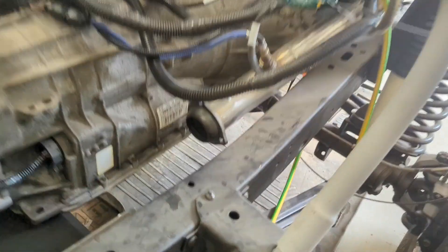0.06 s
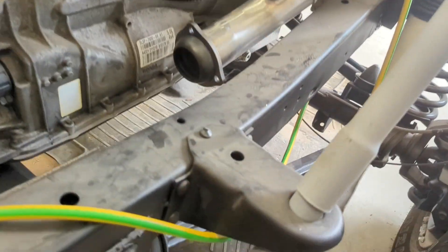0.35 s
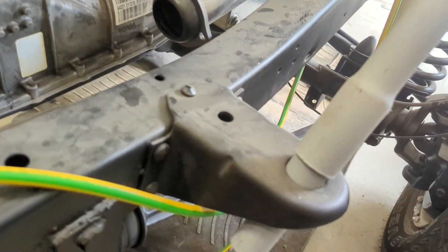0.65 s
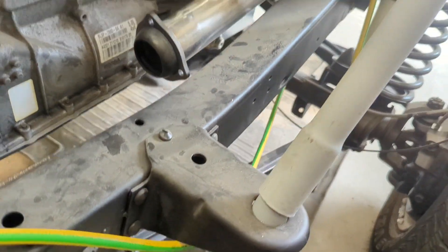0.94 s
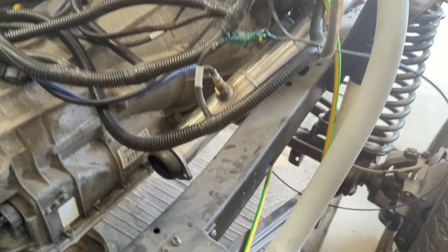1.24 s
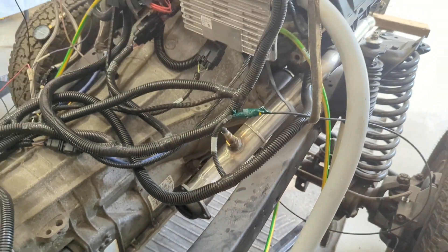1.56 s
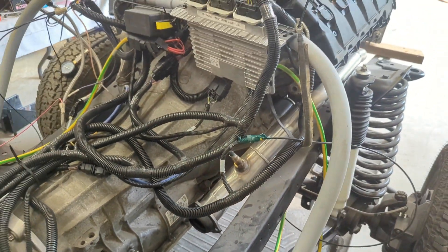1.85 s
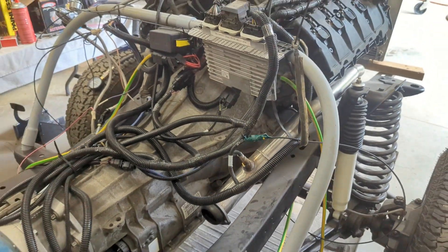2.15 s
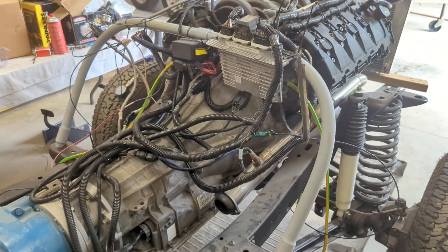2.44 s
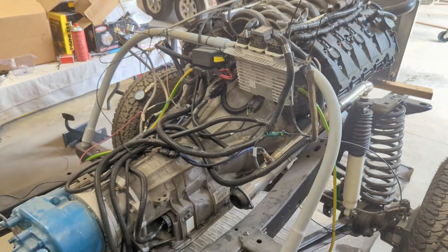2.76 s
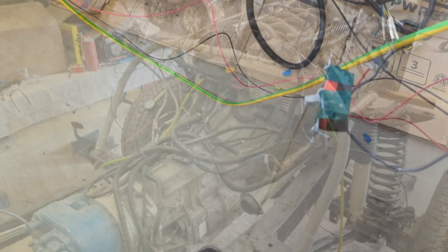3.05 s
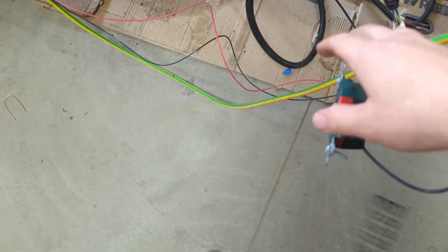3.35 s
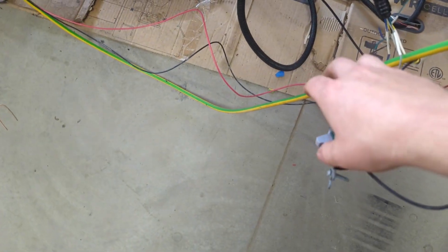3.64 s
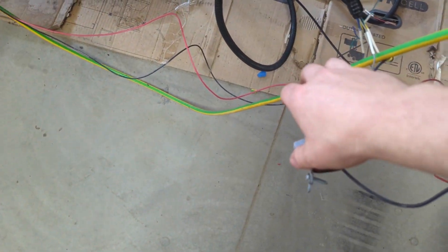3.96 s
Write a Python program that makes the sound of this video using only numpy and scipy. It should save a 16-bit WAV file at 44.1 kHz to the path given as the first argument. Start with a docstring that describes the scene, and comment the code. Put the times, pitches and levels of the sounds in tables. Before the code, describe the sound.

Throbbing V8 engine idling on open pipes, its speed sagging slightly, with sharp spits and ticking.

```python
"""A workshop, where a V8 idles on open exhaust pipes, sagging slowly from about 950 to 770 rpm.
Eight uneven firings puff into two ringing pipes for a lumpy throb, with rising chugs and a gas rasp.
Two cylinders spit sharply in every cycle, as from a leaking manifold. Underneath lie a mechanical
wash, a faint belt whine and a low rumble; a soft scrape passes once. Near 3 s the sound dissolves
to a spot beside the engine, where the pipes bark more and the valves clatter."""
import sys
import numpy as np
from scipy import signal
from scipy.fft import rfft, irfft
from scipy.io import wavfile
from scipy.ndimage import uniform_filter1d, minimum_filter1d

SR = 44100
rng = np.random.default_rng(int(sys.argv[2]) if len(sys.argv) > 2 else 0)


def inscribe(sig):
    """Save sig as 16-bit PCM at rate SR to the path in sys.argv[1].

    A 1-D sig is mono; a 2-D sig holds one channel per row.
    Samples are clipped to [-1, 1] before scaling.
    """
    pcm = np.round(np.clip(np.atleast_2d(sig).T, -1, 1) * 32767)
    wavfile.write(sys.argv[1], SR, pcm.astype(np.int16))


N = 176400
TIME = np.arange(N) / SR

# The lump of the idle, cylinders in firing order: late_ms, strength_db, puff_corner_hz
FAST_FIRINGS = [(-0.7, 7.5, 355), (-3.5, 0.5, 490), (-2, 6, 530), (-3, 18, 274), (-6, 9.5, 610),
                (-1.5, 8.5, 470), (-1.5, 20, 543), (-3, 18, 217)]
SLOW_FIRINGS = [(-3, 20, 162), (-4.5, 20, 200), (-4.5, -2, 940), (-3, 4, 300), (-9, -20, 190),
                (-6.5, 12, 380), (-3, -13.5, 140), (-4.5, 12, 210)]
SIDE_FIRINGS = [(-1.33, 21.2, 175), (-1.62, 29, 128), (-0.22, 4.7, 346), (0, 19.3, 196), (-0.29, 21, 222),
                (1, 21.2, 95), (-1.2, 14.3, 270), (-1.36, 24.7, 146)]
# The pipe each cylinder fires into: pipe_index
PIPE_OF_CYLINDER = [0, 1, 1, 0, 1, 0, 0, 1]
# Resonances of the two pipes, from behind and from the side: pitch_hz, width_hz, gain_db
REAR_PIPE_A = [(92, 29, -9.5), (97.35, 11.4, 3), (201.2, 9.7, -6.5), (480, 68, -15.5)]
REAR_PIPE_B = [(70.4, 17.8, -6), (128.4, 61, -9), (307.2, 13.2, -2.5)]
SIDE_PIPE_A = [(74.7, 18.8, 0), (87.3, 55.6, -1.5), (261.3, 5, 6), (442, 55, 2.5)]
SIDE_PIPE_B = [(113, 21, -10.5), (277.7, 20.7, 10)]
# The engine labouring, from fast-idle tone (0) to slow (1): time_s, load_fraction, throb_gain_db
LOAD = [(0, 0.15, -60.5), (0.701, 0.03, -58), (1.3, 0.3, -57.5), (1.75, 0.65, -56.5), (2.25, 0.73, -59),
        (3.001, 1, -59.5)]
# Rising chugs in every cycle: start_cycles, length_cycles, from_hz, to_hz, level_db
FAST_CHUGS = [(-.28, 0.543, 159.5, 238.7, -19), (-.1, 0.648, 225, 360, -18), (.46, .58, 220, 425, -20),
              (.3, 0.532, 365, 530, -28.5)]
SLOW_CHUGS = [(-.26, 0.582, 98.1, 276.8, -13.5), (-.04, 0.506, 225.6, 351.3, -19.5)]
SIDE_CHUGS = [(-0.2027, 0.817, 84.5, 145.6, -13), (0, .58, 205, 455, -17.5), (-.24, 0.483, 260, 460, -20),
              (0.33, 0.386, 168.4, 287, -18)]
# Tone colours of the noise layers: frequency_hz, relative_db
RASP_COLOUR = [(200, 2), (450, 2.5), (570, -22), (700, -3.5), (1000, -9), (1500, -17), (3000, -25),
               (9000, -37)]
REAR_WASH_COLOUR = [(290, -59), (500, 3.5), (773, 3.5), (880, -4), (1380, -1.5), (2930, -4), (3250, -7),
                    (5240, -12), (9920, -16), (12500, -15), (16000, -36)]
SIDE_WASH_COLOUR = [(290, -6), (500, 3.5), (553, -23), (1180, -18.5), (1440, -14), (3200, -21.5),
                    (12000, -27.5), (16000, -27)]
RUMBLE_COLOUR = [(20, -22), (38, 5), (90, -10), (160, -4.5), (300, -3.5), (450, -9.5), (600, -31),
                 (1200, -40.5)]
SPIT_COLOUR = [(600, 7), (1400, -3), (2100, 5.5), (2900, 2), (3700, -4), (6000, -1.5), (7800, 0),
               (8800, -2), (9400, 1.5), (10300, -7), (11300, 0), (12300, -1.5), (13500, -1.5), (16000, -10)]
TICK_COLOUR = [(600, 7.5), (1500, -2.5), (3000, -5.5), (4200, -6.5), (5300, -6.5), (6500, -4.5), (7700, -7),
               (8800, -8), (10500, -9), (12400, -3), (16000, -18)]
# Two leaking cylinders, a quarter cycle apart; the first also times the crank: start_s, level_db
FIRST_SPITS = [(0.0844, -20), (0.2095, -19.5), (0.3379, -22), (0.4656, -23.5), (0.595, -23.5), (0.729, -22),
               (0.86, -23.5), (0.992, -22.5), (1.1251, -24), (1.259, -26), (1.3942, -23), (1.532, -25),
               (1.6701, -20.5), (1.8133, -22), (1.9575, -24.5), (2.104, -21.5), (2.249, -19), (2.3996, -19),
               (2.5559, -21.5), (2.7116, -23.5), (2.8678, -20.5)]
SECOND_SPITS = [(0.114, -21.5), (0.239, -27), (0.366, -20), (0.4956, -20), (0.6263, -21), (0.7597, -23.5),
                (0.8914, -25), (1.0234, -21), (1.1568, -25.5), (1.289, -26), (1.4267, -23.5), (1.5647, -23),
                (1.7049, -21), (1.8473, -20.5), (1.992, -21), (2.139, -21.5), (2.2813, -24.5),
                (2.4367, -19.5), (2.593, -21), (2.7463, -21.5), (2.9055, -25)]
# The manifold's ring after a spit: pitch_hz, fast_idle_db, slow_idle_db, t60_s
MANIFOLD_MODES = [(2080, -32, -39, 0.12), (2264, -30, -41, 0.074), (2760, -48, -21, 0.061),
                  (2970, -25.5, -25.5, 0.053), (8740, -28.5, -32, 0.06), (9880, -21.5, -26, 0.036),
                  (10440, -20, -34, 0.043), (12280, -22.5, -32, 0.038)]
# Valve ticks in every cycle: start_cycles, relative_db
VALVE_TICKS = [(0, 5), (.24, 2), (.37, -8), (0.562, 3), (.68, -4), (.79, 1.5), (.87, -1), (.11, -5)]
# The loudest valve taps: start_s, level_db
VALVE_TAPS = [(3.2455, -31), (3.2836, -19), (3.3811, -28), (3.4, -15), (3.4381, -20), (3.5574, -11),
              (3.5945, -21), (3.752, -17)]
# The ring of each tap: pitch_hz, relative_db, t60_s
VALVE_MODES = [(5280, -5, 0.02), (6330, -11.5, 0.028), (7150, -26, .03)]
# Stereo placement: frequency_hz, left_minus_right_db
PAN = [(100, 1), (300, -2), (640, 1), (1400, -4), (2200, -9.5), (3100, -5), (6000, -0.5), (15000, 2.5)]
# Stereo focus of the noises: frequency_hz, left_right_correlation
LIKENESS = [(40, .998), (110, 0.97), (300, 0.74), (550, 0.94), (1000, 0.42), (2200, -0.005), (5000, -0.14),
            (10000, 0.22)]
# The workshop's decay: frequency_hz, t60_s
ROOM_DECAY = [(200, 0.15), (2000, 0.18), (6000, 0.11), (14000, 0.057)]

SIDE_START_S, SIDE_CYCLE_S = 2.778, 0.1559
DISSOLVE_S, DISSOLVE_LENGTH_S = 2.82, 0.3
EXHAUST_WET_DB, SPIT_WET_DB = -24.5, -10.5


def amp(db):
    """Decibels to gain."""
    return 10 ** (np.asarray(db) / 20)


def unit(x):
    """Scales to rms 1."""
    return x / np.sqrt(np.mean(x ** 2) + 1e-20)


def curve_at(points, hz):
    """Reads a table on a log-frequency axis."""
    frequencies, values = np.transpose(points)
    return np.interp(np.log(hz + 1), np.log(frequencies), values)


def add(mix, start_s, sound):
    """Mixes a sound in at its start time."""
    i = round(start_s * SR)
    part = mix[max(i, 0):max(i + len(sound), 0)]
    part += sound[max(-i, 0):][:len(part)]


def noise(colour, envelope=1., pan_depth=1.):
    """Noise under an envelope, then coloured and spread in stereo."""
    hz = np.fft.rfftfreq(N, 1 / SR)
    left, independent = rfft(rng.standard_normal((2, N)) * envelope)
    likeness = np.clip(curve_at(LIKENESS, hz), -1, 1)
    right = likeness * left + np.sqrt(1 - likeness ** 2) * independent
    pair = np.array([left, right]) * amp(np.outer([.5, -.5], pan_depth * curve_at(PAN, hz)))
    return irfft(pair * unit(amp(curve_at(colour, hz))), N)


def bursts(events, rise_s, fall_s):
    """A snappy envelope for rows of start_s, level_db; overlaps add in power."""
    t, power = np.arange(SR // 16) / SR, np.zeros(N)
    shape = np.minimum(t / rise_s, 1) * np.exp(-np.maximum(t - rise_s, 0) / fall_s)
    for start_s, db in events:
        add(power, start_s, (amp(db) * shape) ** 2)
    return np.sqrt(power)


def exhaust_throb(starts, cycles, pipes, jitter_ms=0.29, scatter_db=0.37, band_hz=(27.5, 484)):
    """Each firing puffs into its bank's pipe, which rings. Returns the throb and the firings."""
    t, banks, firings = np.arange(SR // 40) / SR, np.zeros((2, N)), []
    for start, end, cylinders in zip(starts, starts[1:], cycles):
        for i, (late_ms, db, corner_hz) in enumerate(cylinders):
            due_s = start + (end - start) * i / len(PIPE_OF_CYLINDER)
            fire_s = due_s + (late_ms + jitter_ms * rng.normal()) / 1000
            db = db + scatter_db * rng.normal()
            omega = 2 * np.pi * corner_hz
            puff = omega * (omega * t) ** 3 * np.exp(-omega * t) / 6  # rounded pulse of unit area
            add(banks[PIPE_OF_CYLINDER[i]], fire_s, amp(db) * puff)
            firings.append((fire_s, db))
    throb = np.zeros(N)
    for puffs, pipe in zip(banks, pipes):
        for k, (hz, width_hz, db) in enumerate(pipe):
            resonance = signal.lfilter(*signal.iirpeak(hz, hz / width_hz, SR), puffs)
            throb += (-1) ** k * amp(db) * resonance  # modes alternate in polarity
    return signal.sosfilt(signal.butter(2, band_hz, "band", fs=SR, output="sos"), throb), firings


def chugs(starts, table, cycle_gains, detune=0.016):
    """Short pitched chugs swell and glide upward in each cycle."""
    out = np.zeros(N)
    for start, end, gain in zip(starts, starts[1:], cycle_gains):
        for place, length, from_hz, to_hz, db in table:
            progress = np.linspace(0, 1, int(length * (end - start) * SR))
            hz = (from_hz + (to_hz - from_hz) * progress) * (1 + detune * rng.normal())
            chug = np.sin(np.pi * progress) * np.sin(2 * np.pi * np.cumsum(hz) / SR)
            add(out, start + place * (end - start), gain * amp(db) * chug)
    return out


def gas_rasp(firings, level_db=-38.5):
    """Gas rushes from the pipe mouths at every firing, more evenly than the puffs."""
    rushes = [(start_s, db / 2) for start_s, db in firings]
    return amp(level_db) * noise(RASP_COLOUR, unit(bursts(rushes, rise_s=0.0028, fall_s=0.013)))


def mechanical_wash(colour, level_db, pan_depth=1.):
    """The running machinery blurs into a steady bed of noise."""
    return amp(level_db) * noise(colour, pan_depth=pan_depth)


def belt_whine(pitch_hz=783, waver_hz=4, start_db=-41.5, fade_db_per_s=2.5):
    """A belt-driven part whines faintly, wavering as it fades."""
    waver = unit(uniform_filter1d(rng.standard_normal(N), size=4000))
    tone = np.sqrt(2) * np.sin(2 * np.pi * np.cumsum(pitch_hz + waver_hz * waver) / SR)
    return amp(start_db - fade_db_per_s * TIME) * tone


def rumble(level_db=-28.5):
    """A steady, centred low end gives the scene weight."""
    return amp(level_db) * noise(RUMBLE_COLOUR, pan_depth=0)


def metal_ring(hits, scatter_db=2.5, detune=0.0154, attack_s=0.00045):
    """Metal rings after each hit (start_s, modes), never quite the same twice."""
    t, out = np.arange(SR // 10) / SR, np.zeros((2, N))
    for start_s, modes in hits:
        for hz, db, t60_s in modes:
            envelope = amp(db + scatter_db * rng.normal() - 60 * t / t60_s) * np.minimum(t / attack_s, 1)
            turns = hz * (1 + detune * rng.normal()) * t
            for channel, side in zip(out, (.5, -.5)):
                tone = np.sin(2 * np.pi * (turns + rng.random()))
                add(channel, start_s, amp(side * curve_at(PAN, hz)) * envelope * tone)
    return out


def manifold_spits(first_gain_db=1, second_gain_db=1.5):
    """Two leaks spit gas and set the manifold ringing; the ring changes colour with the load."""
    first = amp(first_gain_db) * bursts(FIRST_SPITS, rise_s=0.003, fall_s=0.0091)
    second = amp(second_gain_db) * bursts(SECOND_SPITS, rise_s=0.0025, fall_s=0.009)
    times_s, loads, _ = np.transpose(LOAD)
    hits = []
    for start_s, _ in [*FIRST_SPITS, *SECOND_SPITS]:
        load = np.interp(start_s, times_s, loads)
        modes = [(hz, fast_db + (slow_db - fast_db) * load, t60_s)
                 for hz, fast_db, slow_db, t60_s in MANIFOLD_MODES]
        hits.append((start_s, modes))
    return noise(SPIT_COLOUR, first + second) + metal_ring(hits)


def scrape(peak_s=1.33, width_s=0.035, level_db=-29.5):
    """A soft scraping hiss swells and is gone."""
    return noise(TICK_COLOUR, amp(level_db) * np.exp(-((TIME - peak_s) / width_s) ** 2))


def valve_clatter(starts, tick_db=-23, scatter_db=2):
    """Valves tick drily through every cycle; the loudest taps ring."""
    ticks = [(start + place * SIDE_CYCLE_S, tick_db + db + scatter_db * rng.normal())
             for start in starts for place, db in VALVE_TICKS]
    clicks = noise(TICK_COLOUR, bursts(ticks, rise_s=0.0015, fall_s=0.0044), pan_depth=0.061)
    taps = [(start_s, [(hz, tap_db + db, t60_s) for hz, db, t60_s in VALVE_MODES])
            for start_s, tap_db in VALVE_TAPS]
    return clicks + metal_ring(taps)


def workshop_reverb(send):
    """A short tail of dense reflections, the treble dying first."""
    hz, t, spectrum = signal.stft(rng.standard_normal((2, SR // 2)), SR, nperseg=256)
    tail = signal.istft(spectrum * amp(-60 * t / curve_at(ROOM_DECAY, hz)[:, None]), SR)[1]
    return signal.fftconvolve(np.atleast_2d(send), tail / np.linalg.norm(tail[0]), axes=1)[:, :N]


def from_behind():
    """The engine from over the gearbox: sagging throb, paired spits, mechanical wash."""
    spit_s = np.array(FIRST_SPITS)[:, 0]
    lead_in = spit_s[0] - (spit_s[1] - spit_s[0]) * np.array([2, 1])
    run_out = spit_s[-1] + (spit_s[-1] - spit_s[-2]) * np.array([1, 2])
    starts = np.r_[lead_in, spit_s, run_out]  # the crank turns two more cycles at each end
    times_s, loads, gain_db = np.transpose(LOAD)
    slowness = np.clip(np.interp(starts, times_s, loads), 0, 1)
    cycles = [np.array(FAST_FIRINGS) * (1 - slow) + np.array(SLOW_FIRINGS) * slow for slow in slowness]
    throb, firings = exhaust_throb(starts, cycles, [REAR_PIPE_A, REAR_PIPE_B])
    throb *= amp(np.interp(TIME, times_s, gain_db))
    throb += chugs(starts, FAST_CHUGS, 1 - slowness) + chugs(starts, SLOW_CHUGS, slowness)
    spits = manifold_spits()
    reverb = workshop_reverb(amp(EXHAUST_WET_DB) * throb + amp(SPIT_WET_DB) * spits)
    rasp = gas_rasp(firings)
    wash = mechanical_wash(REAR_WASH_COLOUR, level_db=-34)
    return throb + spits + reverb + rasp + wash + belt_whine() + scrape()


def from_the_side(throb_gain_db=-61):
    """The settled idle from beside the engine: barking pipes and valve clatter."""
    starts = SIDE_START_S + SIDE_CYCLE_S * np.arange(10)
    throb, firings = exhaust_throb(starts, [SIDE_FIRINGS] * len(starts), [SIDE_PIPE_A, SIDE_PIPE_B])
    throb = amp(throb_gain_db) * throb + chugs(starts, SIDE_CHUGS, np.ones(len(starts)))
    clatter = valve_clatter(starts)
    reverb = workshop_reverb(amp(EXHAUST_WET_DB) * throb + clatter)
    rasp = gas_rasp(firings)
    wash = mechanical_wash(SIDE_WASH_COLOUR, level_db=-29.5, pan_depth=0.13)
    return throb + clatter + reverb + rasp + wash


def scene():
    """One perspective dissolves into the other at equal power, over a steady rumble."""
    dissolve = np.clip((TIME - DISSOLVE_S) / DISSOLVE_LENGTH_S, 0, 1)
    return np.sqrt(1 - dissolve) * from_behind() + np.sqrt(dissolve) * from_the_side() + rumble()


def record(dry, ceiling=0.45, top_hz=15900):
    """A quick limiter holds the peaks; a steep low-pass trims the air."""
    gain = np.minimum(1, ceiling / (abs(dry).max(0) + 1e-9))
    gain = uniform_filter1d(minimum_filter1d(gain, size=400), size=400)
    low_pass = signal.firwin(511, top_hz, window=("kaiser", 9), fs=SR)
    return signal.oaconvolve(dry * gain, low_pass[None], "same")


dry = scene()
out = record(dry)
inscribe(out)
```